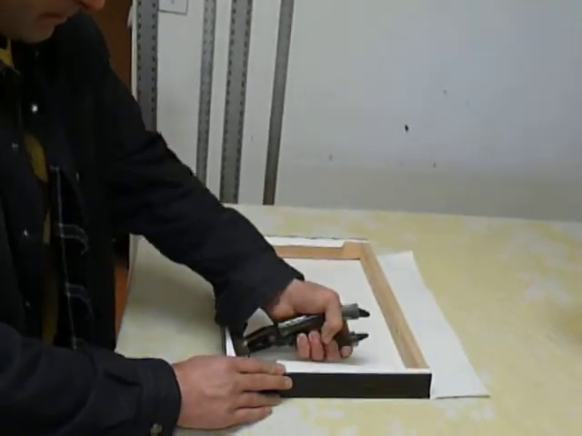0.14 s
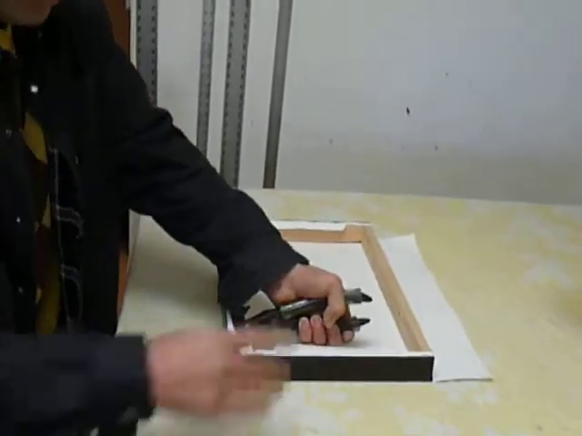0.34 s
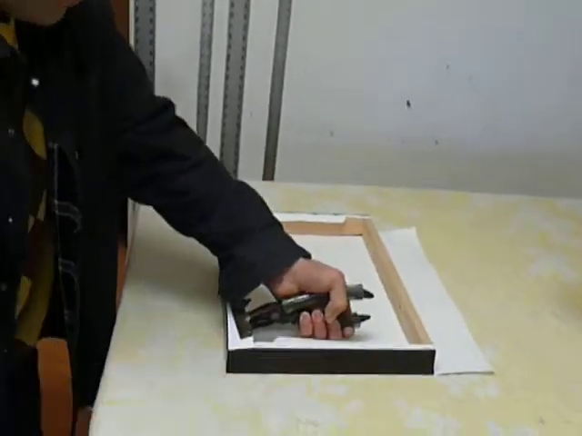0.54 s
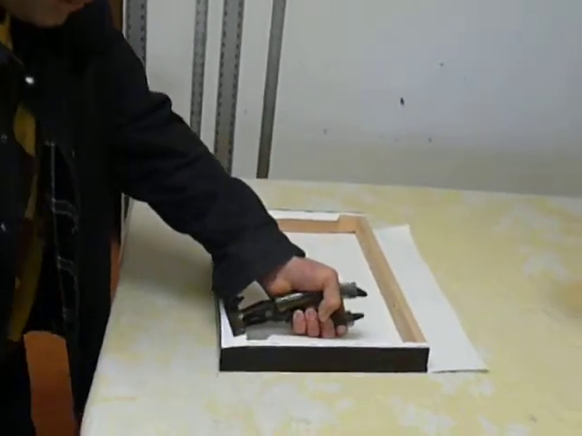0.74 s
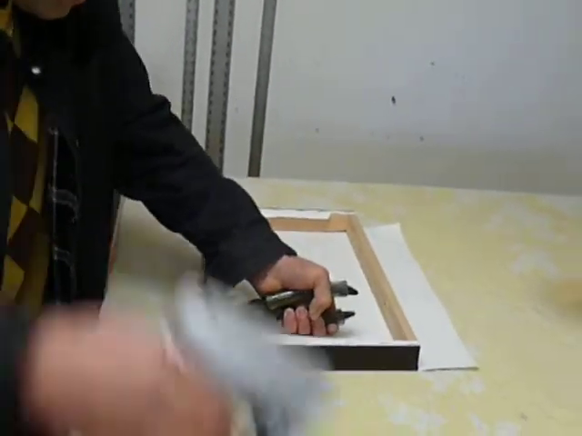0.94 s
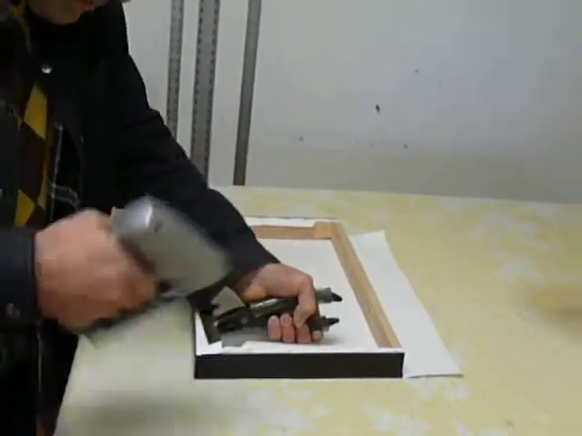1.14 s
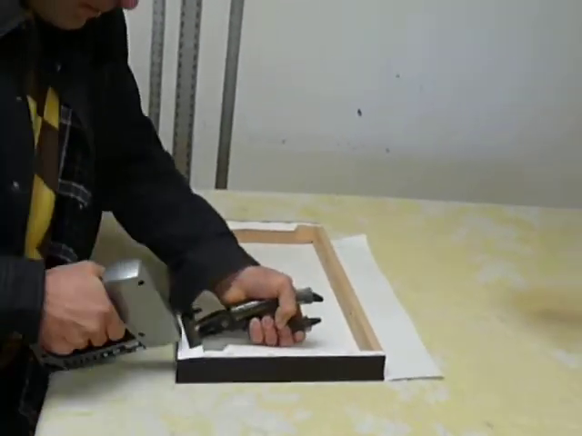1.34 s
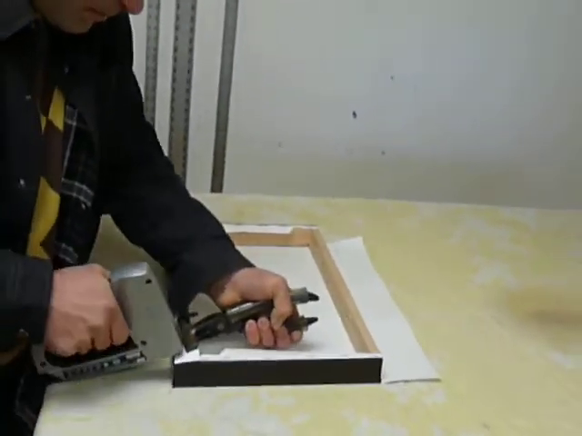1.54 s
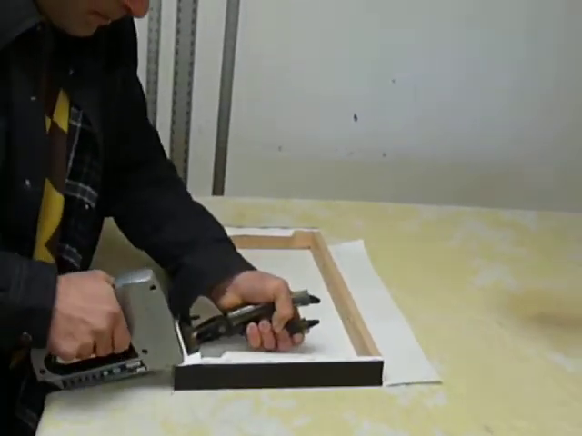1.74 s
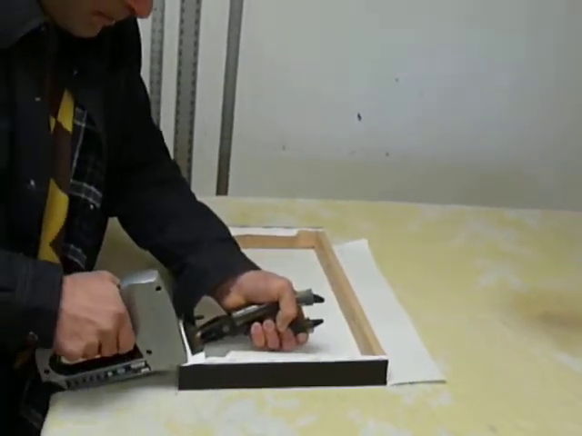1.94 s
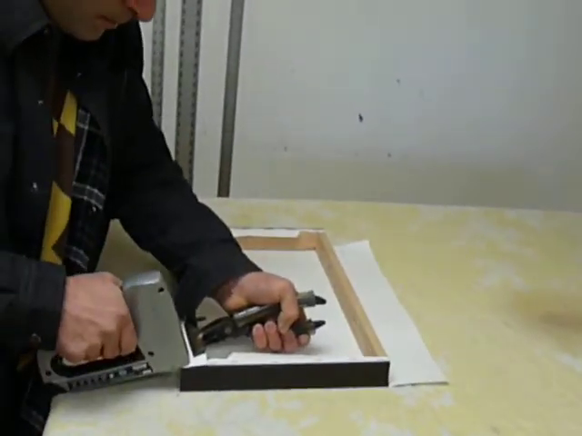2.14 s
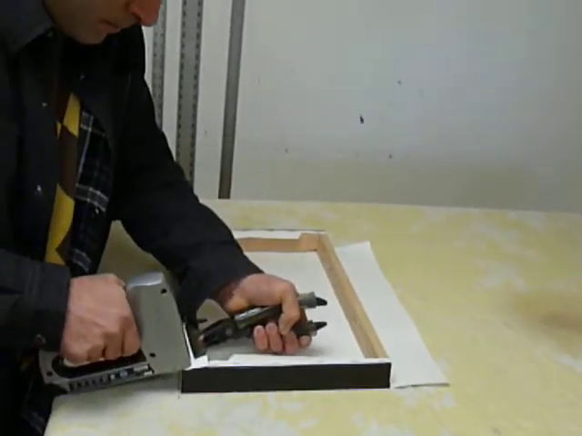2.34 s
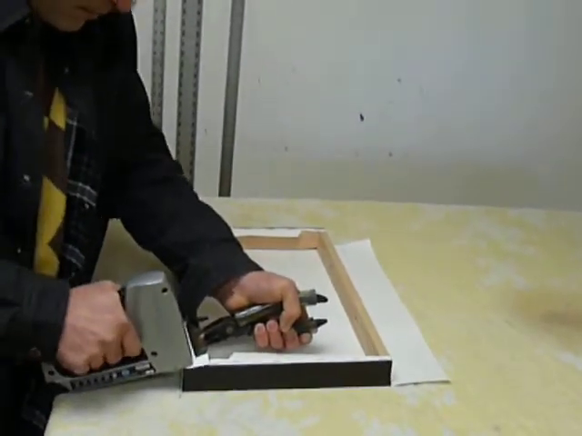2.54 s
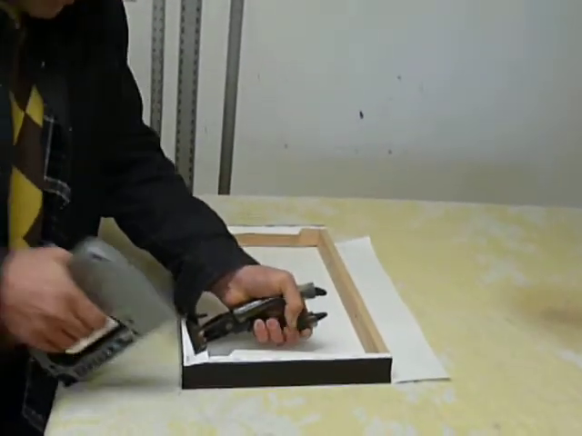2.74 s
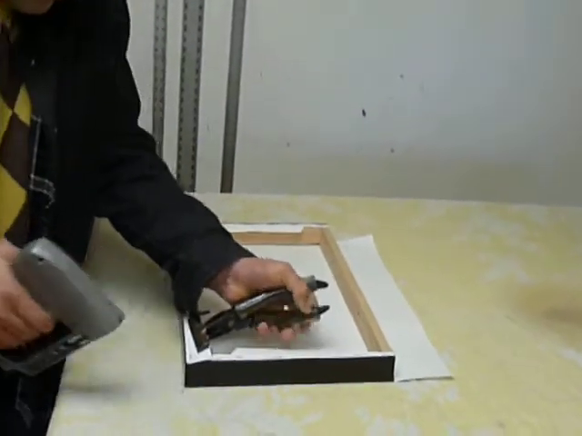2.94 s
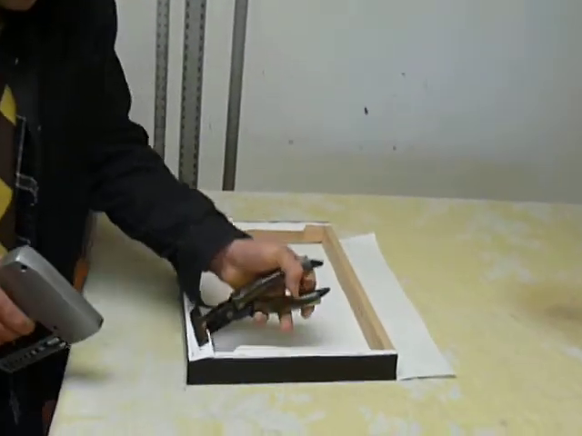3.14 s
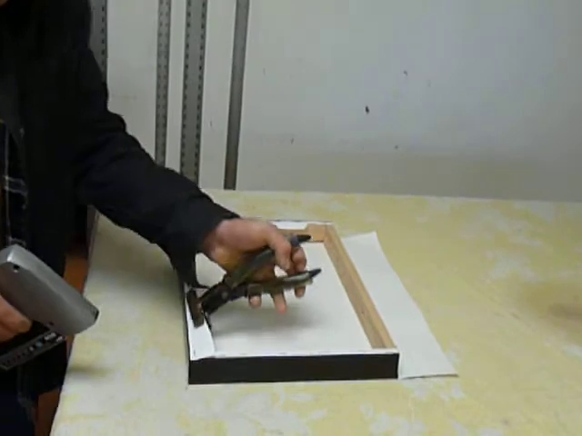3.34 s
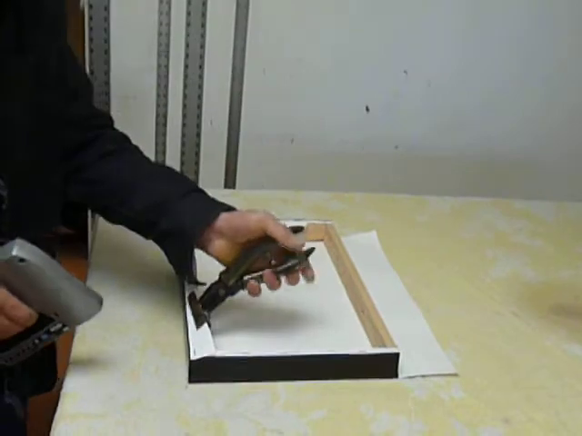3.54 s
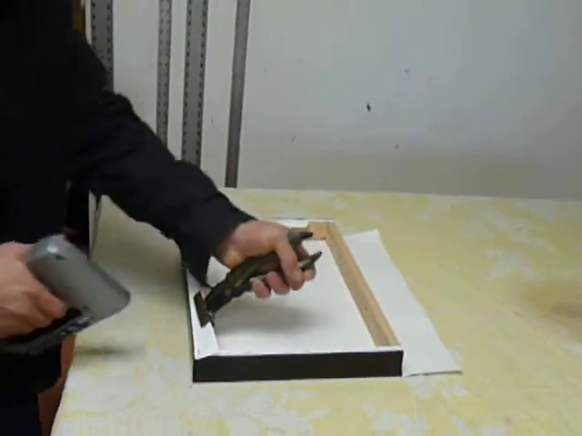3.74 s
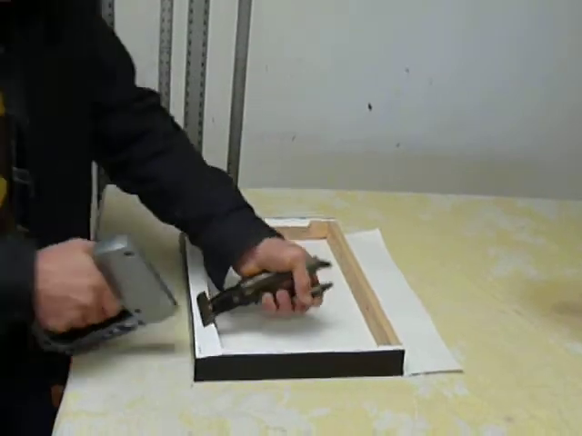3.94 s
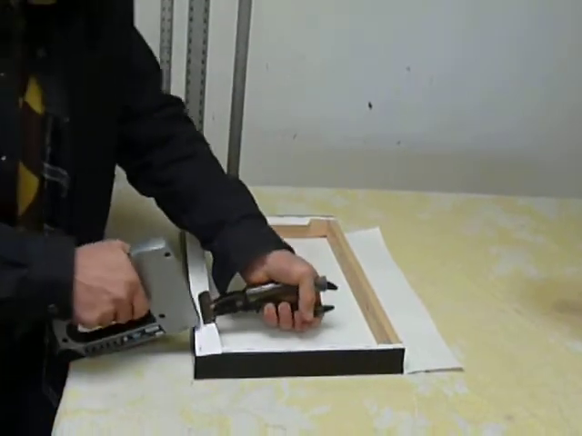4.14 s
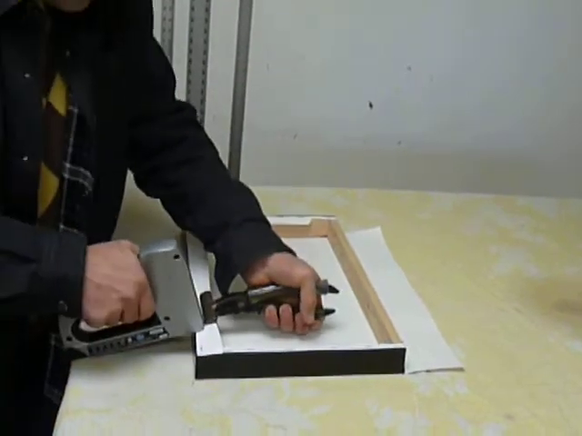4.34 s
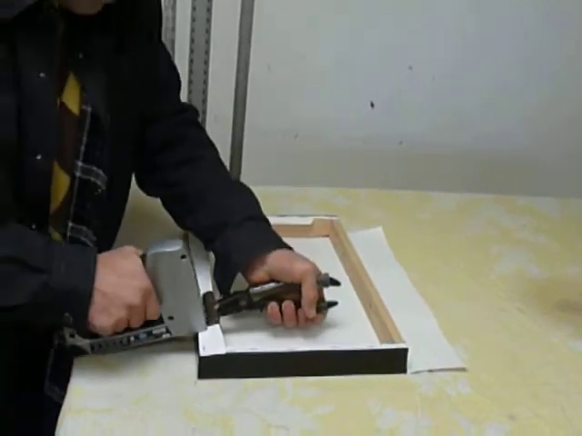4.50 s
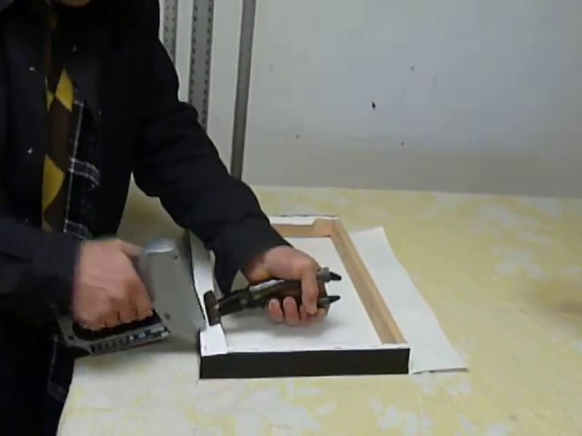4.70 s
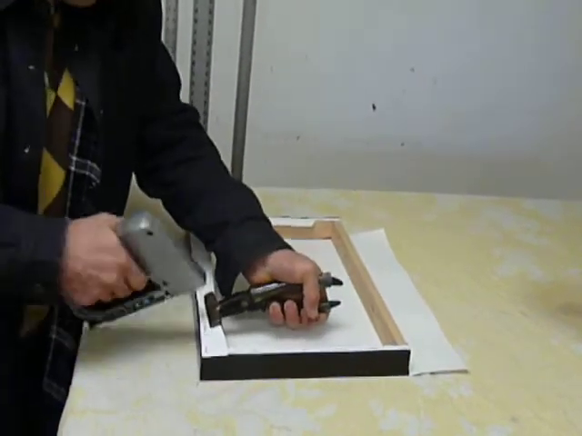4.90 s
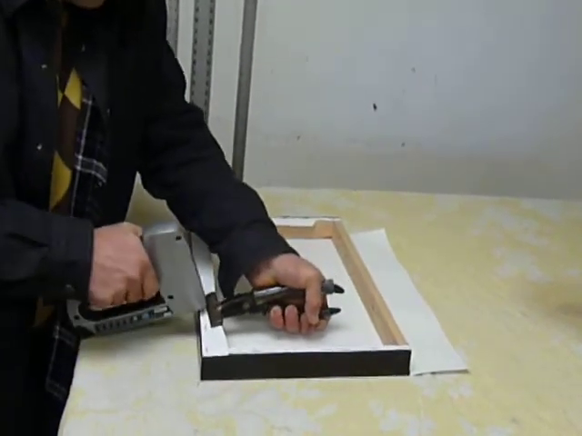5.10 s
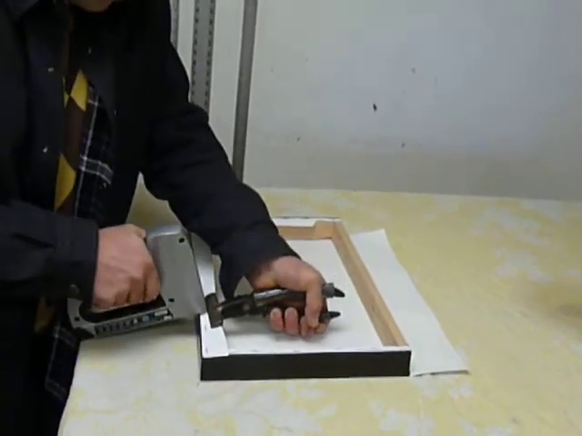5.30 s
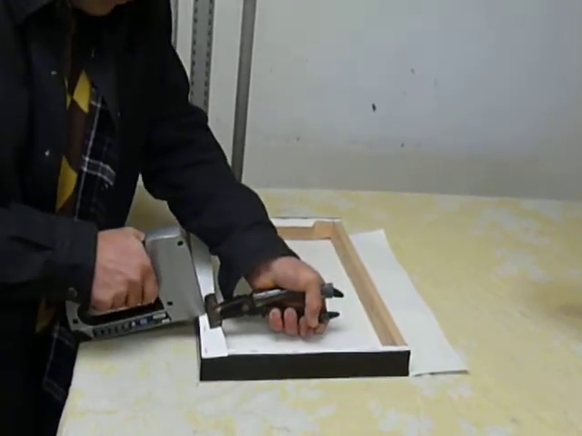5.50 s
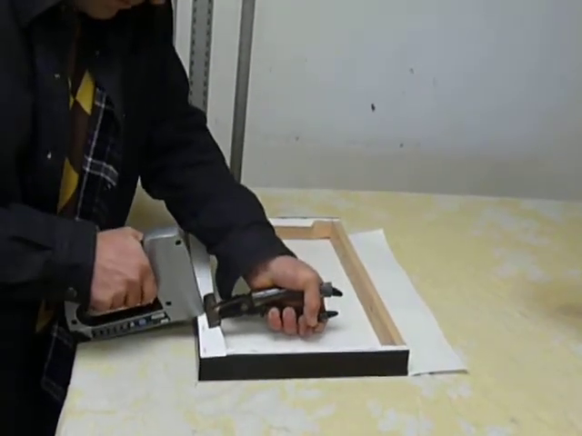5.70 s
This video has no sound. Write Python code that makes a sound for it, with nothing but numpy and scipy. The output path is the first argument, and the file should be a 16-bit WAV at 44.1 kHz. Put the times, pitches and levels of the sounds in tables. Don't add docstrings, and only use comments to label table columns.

```python
import sys
import numpy as np
from scipy import signal
from scipy.fft import rfft, irfft, next_fast_len
from scipy.io import wavfile
from scipy.ndimage import map_coordinates

SR = 44100
rng = np.random.default_rng(int(sys.argv[2]) if len(sys.argv) > 2 else 0)


def generate_wav(signal):
    frames = np.transpose(np.atleast_2d(signal))
    scaled = np.clip(frames, -1, 1) * 32767
    pcm = np.round(scaled).astype(np.int16)
    wavfile.write(sys.argv[1], SR, pcm)


def volts_from_decibels(level):
    exponent = np.asarray(level, float) / 20
    return 10 ** exponent


N = 254016
BLOW_MS = np.arange(-20 * SR // 1000, SR // 20) * 1000 / SR


def noise(length=N):
    return rng.standard_normal(length)


def unit(x):
    return x / np.sqrt(np.mean(x ** 2) + 1e-20)


def along(points, hz):
    f, v = np.transpose(points)
    return np.interp(np.log(hz + 1), np.log(f + 1), v)


def curves(rows, edge_s=0.0027):
    s, *cols = np.transpose(rows)
    t = np.arange(N) / SR
    gate = np.clip(np.minimum(t - s[0], s[-1] - t) / edge_s + 1, 0, 1)
    return gate, [np.interp(t, s, c) for c in cols]


def wobble(rate):
    knots = rng.standard_normal(int(N * rate / SR) + 4)
    return map_coordinates(knots, [np.arange(N) * rate / SR])


def filtered(x, response):
    m = next_fast_len(len(x) + 8192)
    hz = np.fft.rfftfreq(m, 1 / SR)
    return irfft(rfft(x, m) * response(hz), m)[:len(x)]


def resonant(peaks, f):
    total = 0
    for k, (center, width, db) in enumerate(peaks):
        damping = 1j * f * width
        total = total + (-1) ** k * volts_from_decibels(db) * damping / (center * center - f * f + damping + 1e-9)
    return total


def add(track, s, sound):
    part = track[round(s * SR):][:len(sound)]
    part += sound[:len(part)]


def burst(hz, spread, t60, attack, snap):
    t = np.arange(SR // 3) / SR
    push = noise(len(t)) * volts_from_decibels(-60 * t / max(t60, .01)) * (1 - np.exp(-t / attack))
    push[int(attack * SR)] += snap
    ring = filtered(push, lambda f: resonant([(hz, spread * hz, 0)], f) ** 2)
    return ring / np.abs(ring).max()


def ringing(hz, rise, t60, beat_db, lasts=.3):
    t = np.arange(SR // 3) / SR
    waver = np.interp(t, np.arange(30) / 80, rng.standard_normal(30))
    shape = (1 - np.exp(-t / rise)) * np.clip((lasts - t) / 0.034 + 1, 0, 1)
    return volts_from_decibels(beat_db * waver - 60 * t / max(t60, .05)) * shape * np.sin(2 * np.pi * hz * t)


def held(s, lasts, sag, release):
    t = np.arange(N) / SR - s
    falling = -sag * np.minimum(t, lasts) - release * np.maximum(t - lasts, 0)
    return np.where(t > 0, falling, 9000 * t)


def scrape():
    return unit(filtered(noise(len(BLOW_MS)), lambda f: resonant([(2200, 2200, 0)], f)))


# crest_s, peak_db, steel_pitch_hz, pitch_sag_per_ms, frame_bark_hz
SHOT_LIST = [
    (2.4173, -.7, 2850, .31, 1130),
    (4.5003, -4.3, 3000, .38, 1200),
]


def blows():
    out, ms = np.zeros(N), BLOW_MS
    for s, db, hz, sag, bark_hz in SHOT_LIST:
        rise_ms, fall_ms, bark_ms = .43, .92, .36
        swell = np.exp(-np.where(ms < 0, (ms / rise_ms) ** 2, ms / fall_ms))
        steel = swell * np.cos(2 * np.pi * hz / 1000 * ms * (1 - sag * ms / 2))
        late = np.maximum(ms - .12, 0)
        bark_shape = -late * np.exp(1 - late / bark_ms) / bark_ms
        bark = bark_shape * np.sin(2 * np.pi * bark_hz / 1000 * late)
        thud = np.exp(-((ms - .3) / 0.54) ** 2)
        blow = steel + volts_from_decibels(-11) * bark + volts_from_decibels(-19.0) * thud
        echo = np.roll(blow, round(.0028 * SR))
        rattle = (ms > 1) * volts_from_decibels(-60 * ms.clip(0) / 30) * scrape()
        add(out, s + ms[0] / 1000, volts_from_decibels(db) * (blow + volts_from_decibels(-19.5) * echo + volts_from_decibels(-18) * rattle))
    return out


# lead_s, level_db
LATCH_SLIPS = [
    (.017, -37),
    (.013, -33),
]


def latch_slips():
    out, ms = np.zeros(N), BLOW_MS
    for (s, *_), (lead, db) in zip(SHOT_LIST, LATCH_SLIPS):
        sliding = (ms > -1000 * lead) * (ms < 0)
        growth = np.clip(1 + ms / (1400 * lead), 0, 1)
        add(out, s + ms[0] / 1000, volts_from_decibels(db) * scrape() * growth * sliding)
    return out


# table_boom_db, room_wash_db, held_s, boom_release_db_per_s
TAILS = [
    (-32, -29.5, .15, 496),
    (-27.5, -26.5, 0.13, 212),
]
# pitch_hz, width_hz, level_db
BODY_PEAKS = [
    [(258, 144, -3), (1094, 16, -13), (1460, 38, -25.5), (1912, 120, -11.5), (2120, 87, -10.5),
     (2620, 110, -14.5), (3150, 36, -16.5), (3310, 61, -13)],
    [(202, 25, -7.5), (409, 100, -14), (866, 40, -4), (1070, 28, 3), (1520, 170, -9), (1880, 52, -7),
     (2034, 130, -4), (3240, 280, -14)],
]


def tails():
    out = np.zeros(N)
    for (s, *_), (boom_db, wash_db, lasts, release), body in zip(SHOT_LIST, TAILS, BODY_PEAKS):
        start, boom_sag = s + .005, 33.5
        colour = lambda f: np.abs(resonant(body, f)) + volts_from_decibels(-19.5)
        low = lambda f: 1 / (1 + (f / 680) ** 8) / (1 + (140 / (f + 1)) ** 6)
        high = lambda f: (f < 4500) / (1 + (640 / (f + 1)) ** 8)
        boom = unit(filtered(noise(), lambda f: colour(f) * low(f)))
        linger = volts_from_decibels(-7.5 + held(start, .27, boom_sag, 600))
        out += volts_from_decibels(boom_db - 6.0) * (volts_from_decibels(held(start, lasts, boom_sag, release)) + linger) * boom
        grain = noise() * volts_from_decibels(1.5 * wobble(400))
        wash = unit(filtered(grain, lambda f: colour(f) * high(f)))
        out += volts_from_decibels(wash_db + held(start, lasts, 97.5, 183)) * wash
    return out


# start_s, peak_db, pitch_hz, lasts_s
TABLE_RINGS = [
    (2.425, -31.5, 305, 0.12),
    (2.45, -36, 450, 0.054),
    (2.515, -27.5, 225, 0.024),
    (4.505, -31.5, 464, 0.13),
    (4.505, -39, 1084, .155),
    (4.505, -41, 856, 0.12),
    (4.58, -29.5, 225, 0.2),
    (4.51, -40, 1100, 0.093),
    (4.256, -36, 418, 0.057),
]


def table_rings():
    out = np.zeros(N)
    for s, db, hz, lasts in TABLE_RINGS:
        add(out, s, volts_from_decibels(db) * ringing(hz, 0.0063, 0.63, beat_db=3.5, lasts=lasts))
    return out


# start_s, peak_db, pitch_hz, upper_ring_db (against the lower)
STEEL_CLICKS = [(.597, -39, 1900, 2.5), (.693, -37.5, 1710, -8), (1.11, -37, 1720, 1),
                (1.346, -35.5, 1740, 2.5), (2.671, -34.5, 1920, 1.5), (2.749, -20.5, 2200, -6.5),
                (2.754, -31, 2300, -12), (2.708, -38, 2000, 1), (2.724, -42, 1800, 10),
                (2.737, -34, 2000, 1), (3.708, -48, 1800, -1), (3.735, -38, 1900, 3.5),
                (4.725, -31.5, 1850, -2), (4.797, -28.5, 1800, 1), (4.802, -28.5, 1770, 2),
                (4.856, -38.5, 1720, 7), (4.909, -40.5, 1580, 4)]
# start_s, peak_db, pitch_hz, upper_ring_db
FRAME_TAPS = [(.567, -37, 800, 3.5), (.577, -41, 825, 5), (.596, -34, 850, -6), (.656, -39.5, 910, -4),
              (.925, -41, 950, -3), (3.062, -43.5, 1060, -6), (3.258, -38, 950, -13), (3.453, -41, 1020, 5),
              (3.506, -44.5, 850, -12), (4.249, -26, 787, -2.5), (5.277, -28.5, 850, -9),
              (5.55, -38, 804, -6.5)]


def clicks_and_taps():
    out = np.zeros(N)
    for rows, (upper, spread, t60) in (STEEL_CLICKS, (1.63, .54, .11)), (FRAME_TAPS, (2.29, .51, .098)):
        for s, db, hz, upper_db in rows:
            lower_ring = burst(hz, spread, t60, 0.00041, snap=11.9)
            upper_ring = burst(upper * hz, 0.35, 0.71 * t60, .0004, snap=10.3)
            add(out, s, volts_from_decibels(db) * (lower_ring + volts_from_decibels(upper_db) * upper_ring))
    return out


# start_s, peak_db, pitch_hz, upper_ring_db
DULL_KNOCKS = [(0.177, -46, 297, -6), (.257, -40.5, 306, -19), (1.352, -31.5, 192, 4),
               (1.376, -36.5, 282, -8), (1.472, -39.5, 218, -3.5), (1.858, -42.5, 202, -14),
               (1.985, -43, 214, -13), (2.635, -34.5, 255, -12), (2.589, -40, 274, -11),
               (2.69, -40, 288, -12), (3.277, -51.5, 353, 0), (4.252, -29.5, 433, 0.5),
               (4.288, -45, 590, 7), (5.279, -28.5, 414, -0.5), (5.309, -30.5, 301.6, -8),
               (5.482, -28, 186.6, -5), (5.51, -38.5, 277, -12), (5.552, -36.5, 271, -1)]


def knocks():
    out, t60 = np.zeros(N), 0.25
    for s, db, hz, upper_db in DULL_KNOCKS:
        tone = ringing(hz, 0.0046, t60, beat_db=4)
        wood = burst(hz, .9, t60, 0.0043, snap=12.0)
        upper = burst(1.73 * hz, 0.81, 0.59 * t60, 0.0013, snap=10)
        add(out, s, volts_from_decibels(db - 4.5) * (tone + 1.6 * wood))
        add(out, s, volts_from_decibels(db + upper_db) * upper)
    return out


# start_s, peak_db, pitch_hz
FLOOR_THUMPS = [
    (1.352, -37, 78),
    (2.42, -40, 65),
    (2.64, -39, 85),
    (4.5, -38, 66),
    (4.655, -40, 72),
    (5.487, -39, 75),
]


def thumps():
    out = np.zeros(N)
    for s, db, hz in FLOOR_THUMPS:
        add(out, s, volts_from_decibels(db) * ringing(hz, .005, .2, beat_db=.1))
    return out


# time_s, pitch_hz, level_db
SQUEAK_PATH = [
    (4.025, 1180, -66),
    (4.045, 1350, -56),
    (4.105, 1450, -55),
    (4.13, 1440, -58),
    (4.142, 1280, -51.5),
    (4.178, 1260, -46),
    (4.195, 1225, -53.5),
    (4.225, 1120, -61),
]


def squeak():
    gate, (hz, db) = curves(SQUEAK_PATH)
    octave_db = db + 0.085 * (hz - 1400)
    rough_hz = hz * (1 + .005 * wobble(60) + .035 * wobble(700))
    phase = 2 * np.pi * np.cumsum(rough_hz) / SR
    tone = volts_from_decibels(db + 5 + 3.7 * wobble(80)) * np.sin(phase)
    octave = volts_from_decibels(octave_db + 6.0 + 2.8 * wobble(80)) * np.sin(2 * phase)
    return gate * (tone + octave)


# start_s, length_s, level_db, swell_db (over the
RUB_STROKES = [
    (0.607, 0.37, -51.5, 1),
    (1.403, 0.12, -49.5, 1),
    (2.686, 0.089, -44, 1),
    (3.006, 0.37, -49, -10),
    (4.743, .05, -42, 1.5),
    (5.084, .16, -48, 0),
    (4.188, 0.031, -48, 2),
]
# pitch_hz, width_hz, level_db
RUB_PEAKS = [
    [(870, 98, -8.5), (1710, 330, -7.5), (3100, 92, -10)],
    [(800, 43, 2), (1360, 26, 8), (2000, 51, -0.5), (2810, 43, -3)],
    [(2200, 140, 3), (2300, 33, -8), (2740, 41, 1), (3450, 28, -23)],
    [(2180, 130, -22), (3170, 69, -1)],
    [(1800, 27, 1), (2630, 44, 3.5), (3350, 130, -16)],
    [(860, 15, 2.5), (1226, 16, 5), (1800, 24, -2), (2630, 36, -1.5), (2850, 52, -12.5)],
    [(850, 80, 7), (1900, 250, 3), (2900, 200, 0.5)],
]


def rubbing():
    out = np.zeros(N)
    for (s, lasts, db, swell_db), peaks in zip(RUB_STROKES, RUB_PEAKS):
        grains = noise() * volts_from_decibels(1.8 * wobble(45) + 1.5 * wobble(300))
        wide = np.multiply(peaks, [1, 2.5, 1])
        cloth = unit(filtered(grains, lambda f: resonant(wide, f) + volts_from_decibels(-14.5) * (f > 500)))
        out += volts_from_decibels(db + held(s, lasts, -swell_db / lasts, 350)) * cloth
    return out


# pitch_hz, level_db (peak)
LAMP_HUM = [(120.3, -45.5), (240.6, -50.5), (360.9, -66.5), (481.2, -70), (601.5, -65.5)]


def lamp_hum():
    t = np.arange(N) / SR
    drift = 0.22 * wobble(6.8)
    out = np.zeros(N)
    for k, (hz, db) in enumerate(LAMP_HUM):
        out += volts_from_decibels(db - 0.5 + 1.1 * wobble(1.9)) * np.sin(2 * np.pi * hz * t + k * (1.17 + drift))
    return out


# pitch_hz, level_db (per Hz)
HISS_COLOUR = [(25, -9.5), (50, -3), (78, -7.5), (100, 1), (170, 0.5), (300, -1), (500, -6), (900, -8),
               (1500, -11.5), (2200, -9.5), (3000, -6.5), (3700, -5.5), (4100, -8), (4500, -18.5)]


def hiss():
    rumble = lambda f: np.abs(resonant([(77, 19, 2.6)], f))
    air = filtered(noise(), lambda f: (volts_from_decibels(along(HISS_COLOUR, f)) + rumble(f)) * (f < 4600))
    return volts_from_decibels(-49.5 + 0.2 * wobble(2.5)) * unit(air)


# time_s, level_db
DRONE_LEVEL = [(0, -44.5), (1.2, -45.5), (2.2, -55.5), (3.6, -47), (4.9, -54.5), (5.76, -50)]


def drone():
    murmur = unit(filtered(noise(), lambda f: resonant([(307, 220, -2.5), (423, 60, -9)], f)))
    level_db, = curves(DRONE_LEVEL)[1]
    return volts_from_decibels(level_db - 10.5 + 2.5 * wobble(25)) * murmur


# after_s, gain_db, offset_swing (full scale 1)
DUCK_PATH = [
    (0, 0, 0),
    (.012, -3, .014),
    (.04, -3, .012),
    (.12, -4, -.003),
    (.17, -4.5, -.007),
    (.26, -2.5, -.0025),
    (.34, 0, 0),
]


def ducking():
    after, gain_db, swing = np.transpose(DUCK_PATH)
    t = np.arange(N) / SR
    return [sum(np.interp(t - shot[0], after, v, 0, 0) for shot in SHOT_LIST) for v in (gain_db, swing)]


def scene():
    gun = blows() + latch_slips() + tails() + table_rings()
    handling = clicks_and_taps() + knocks() + thumps() + squeak() + rubbing()
    workshop = lamp_hum() + hiss() + drone()
    return (gun + handling + volts_from_decibels(ducking()[0]) * workshop)[None]


# pitch_hz, level_db
MIC_BAND = [(3700, 0), (4000, -4), (4250, -11), (4450, -20), (4650, -50), (4900, -120)]


def microphone(sound):
    x = filtered(sound, lambda f: volts_from_decibels(along(MIC_BAND, f))) + .007 + ducking()[1]
    return np.minimum(x, .705)


def low_pass(x):
    return signal.sosfilt(signal.butter(12, 15500, fs=SR, output="sos"), x)


def record(dry):
    mix = microphone(dry[0])[None]
    return low_pass(mix)


dry = scene()
out = record(dry)
generate_wav(out)
```